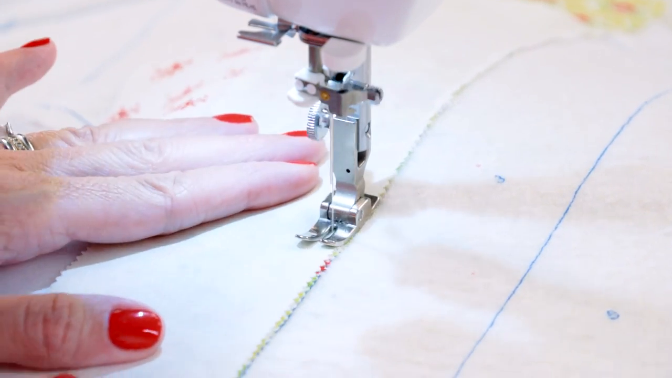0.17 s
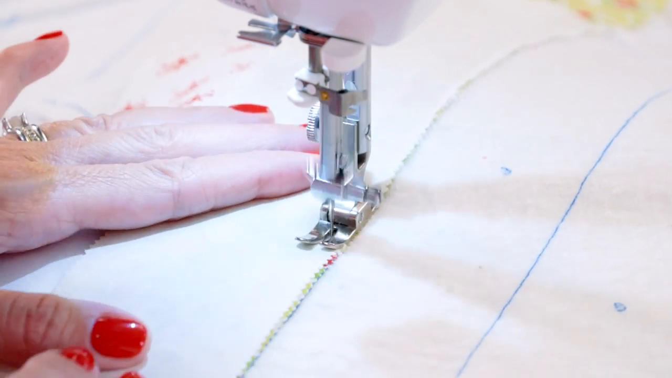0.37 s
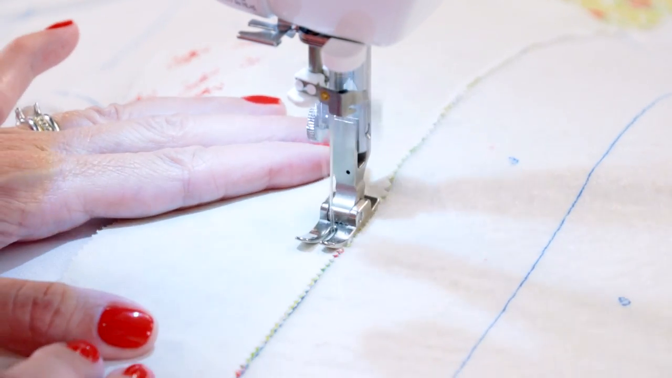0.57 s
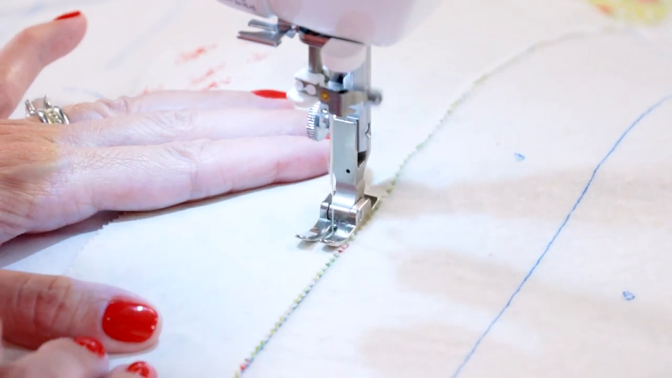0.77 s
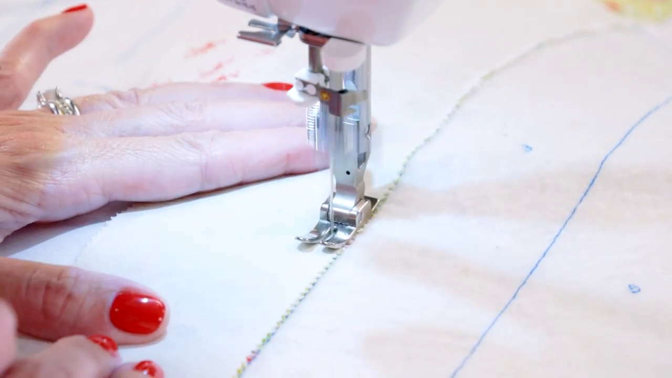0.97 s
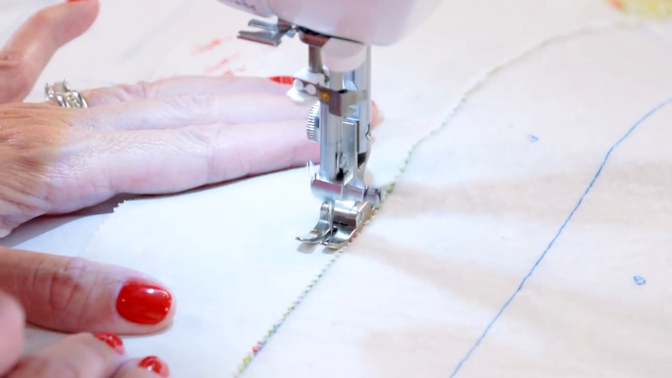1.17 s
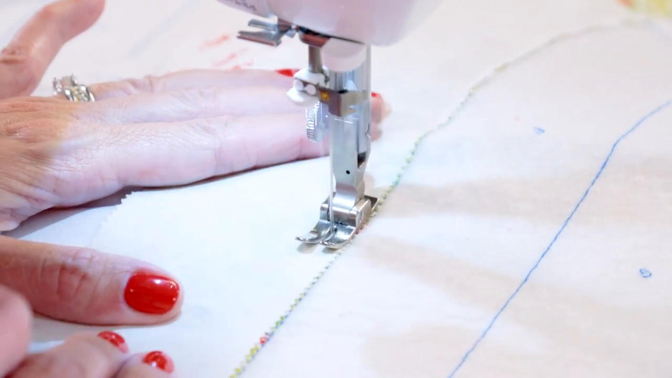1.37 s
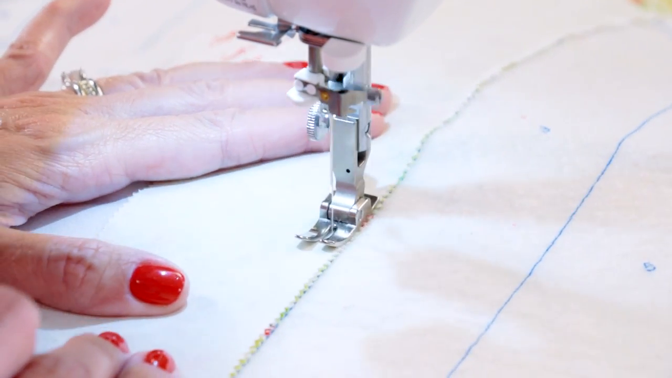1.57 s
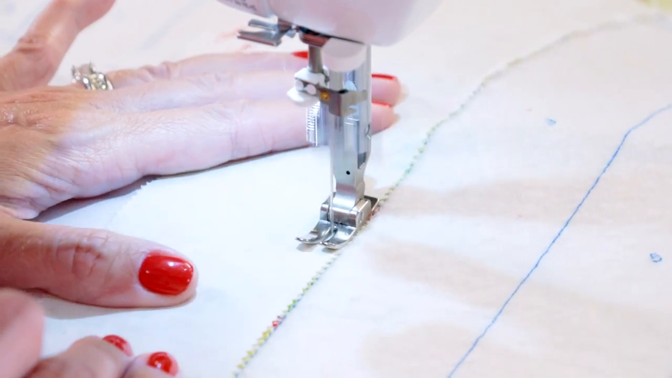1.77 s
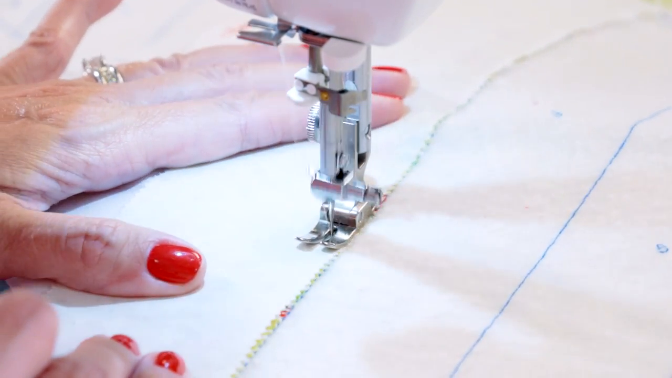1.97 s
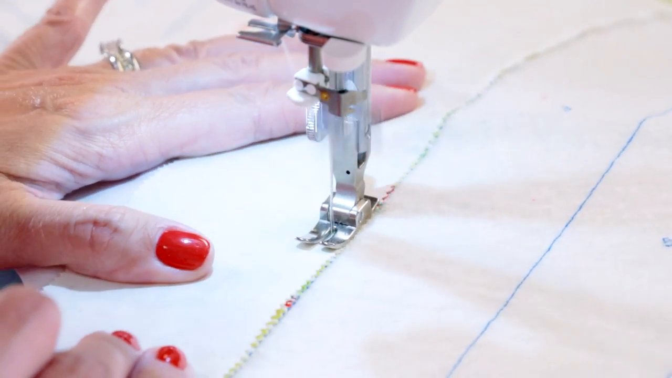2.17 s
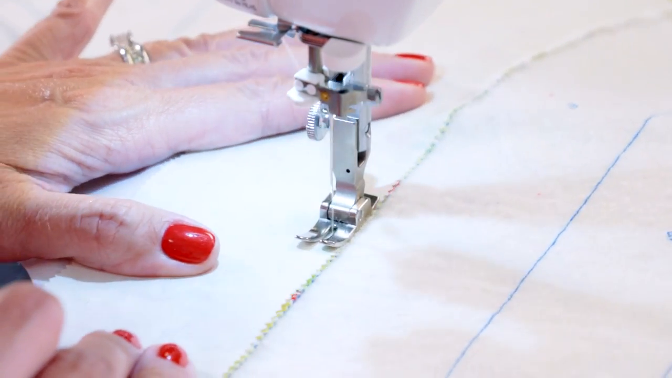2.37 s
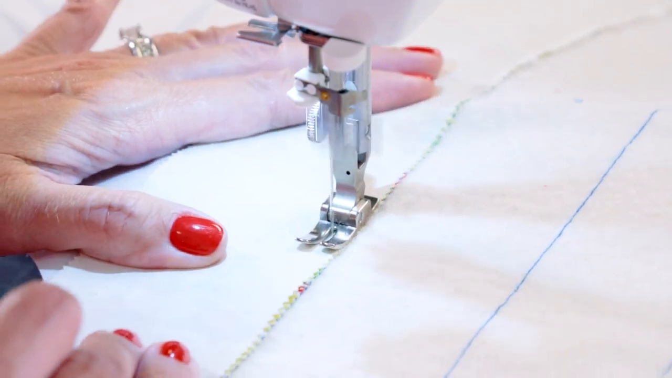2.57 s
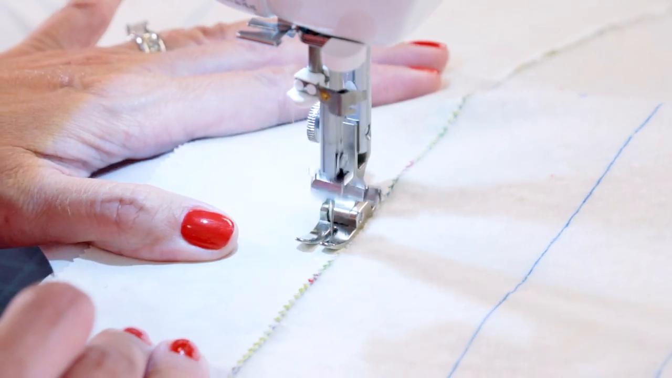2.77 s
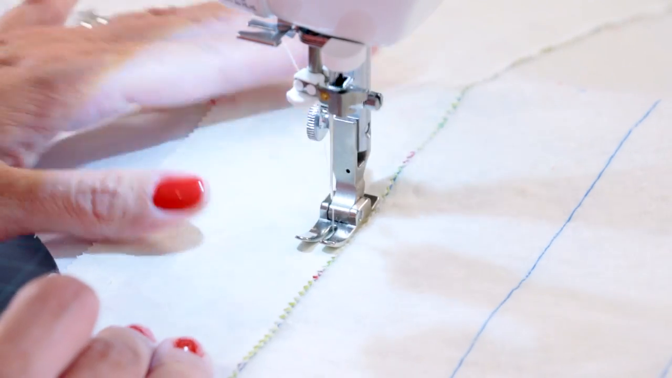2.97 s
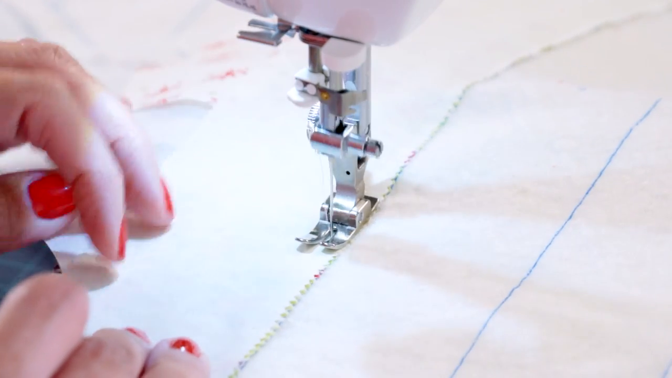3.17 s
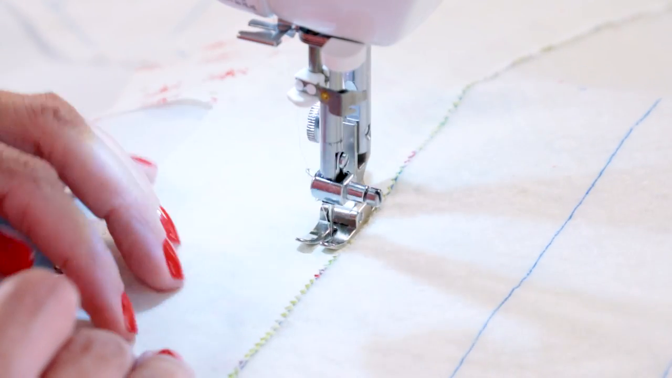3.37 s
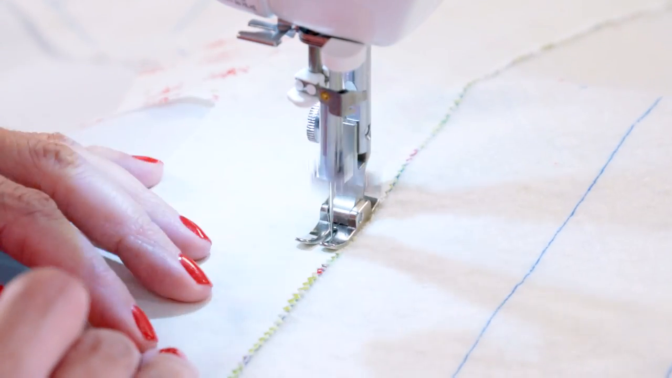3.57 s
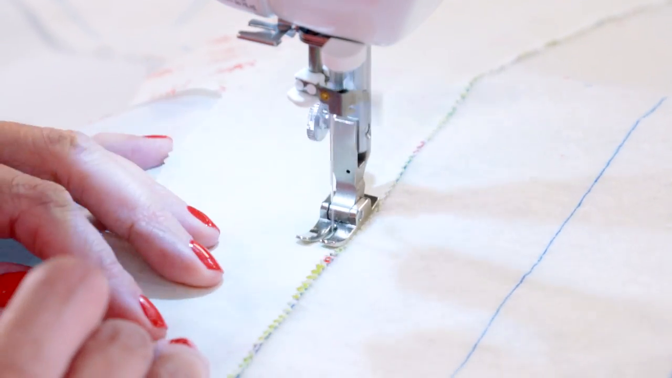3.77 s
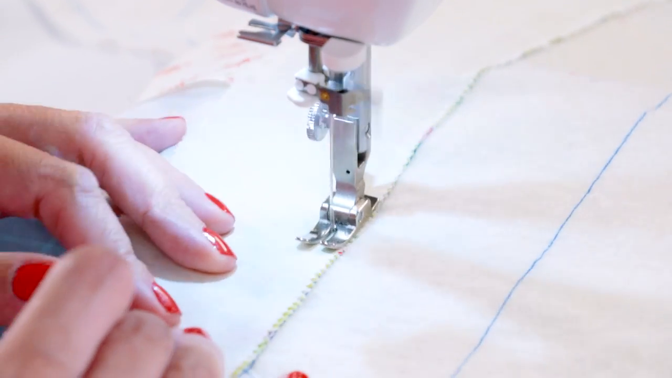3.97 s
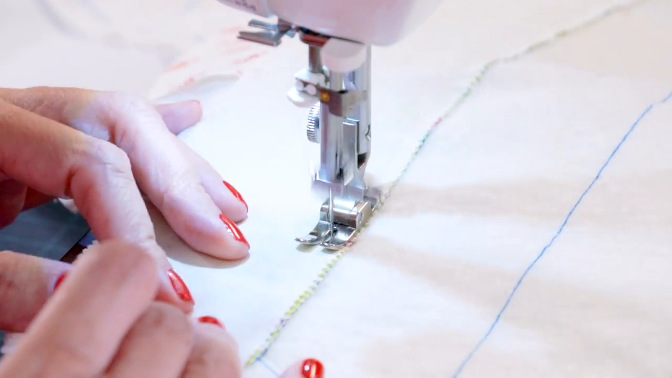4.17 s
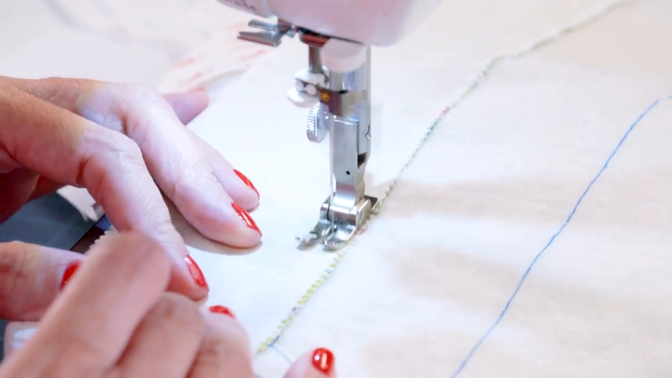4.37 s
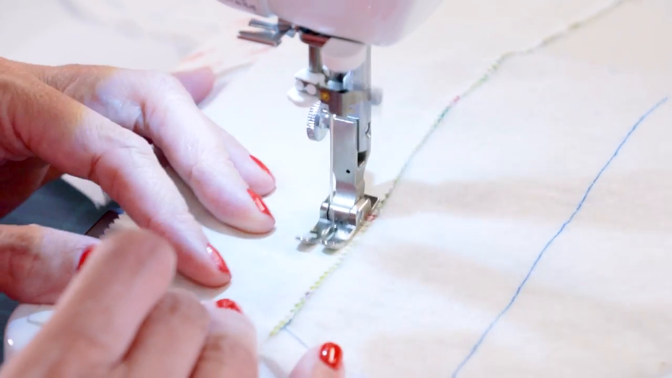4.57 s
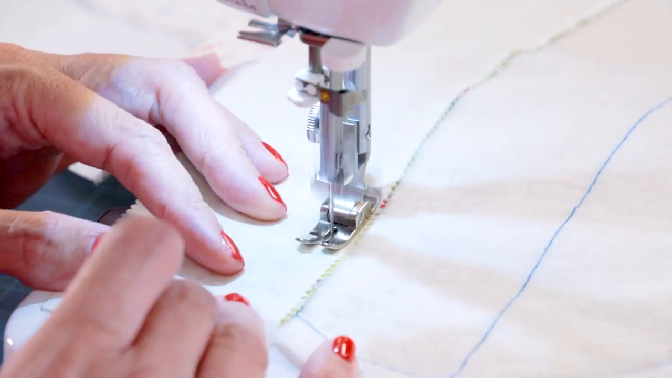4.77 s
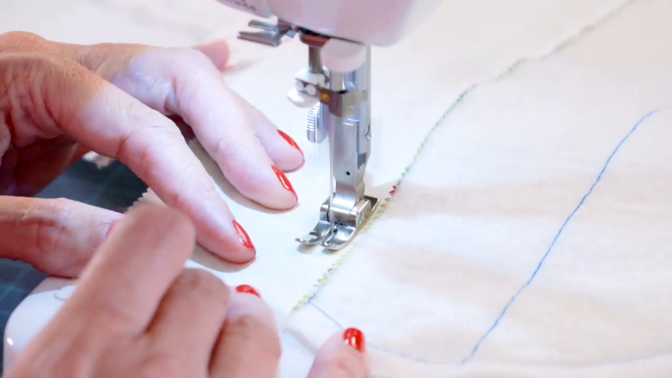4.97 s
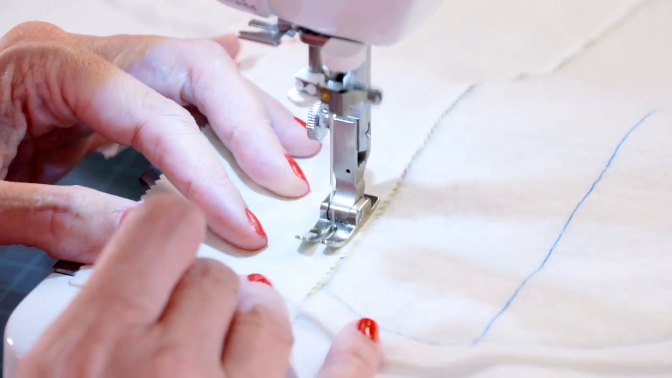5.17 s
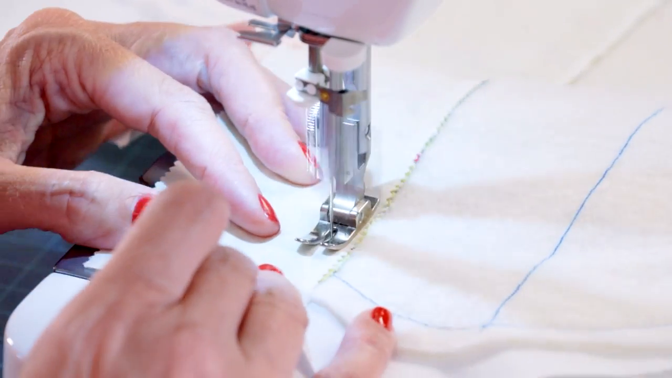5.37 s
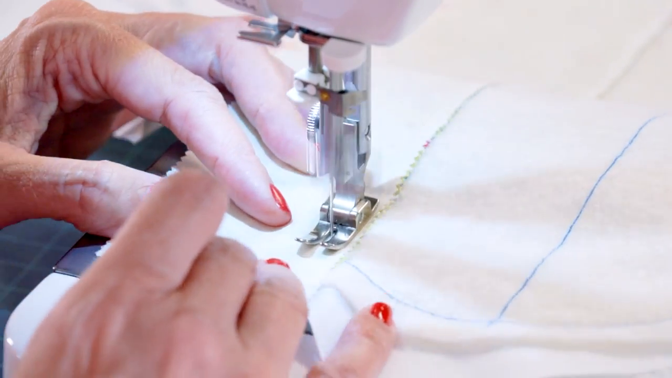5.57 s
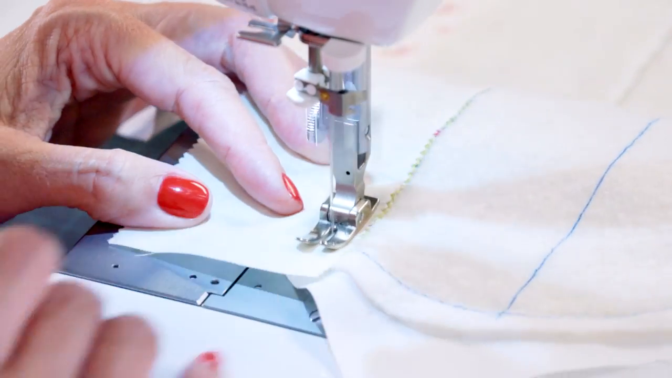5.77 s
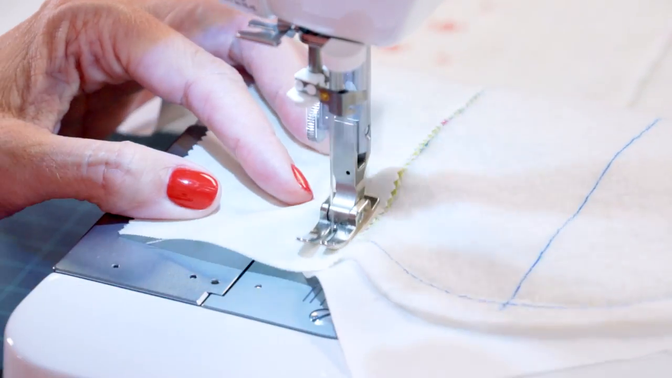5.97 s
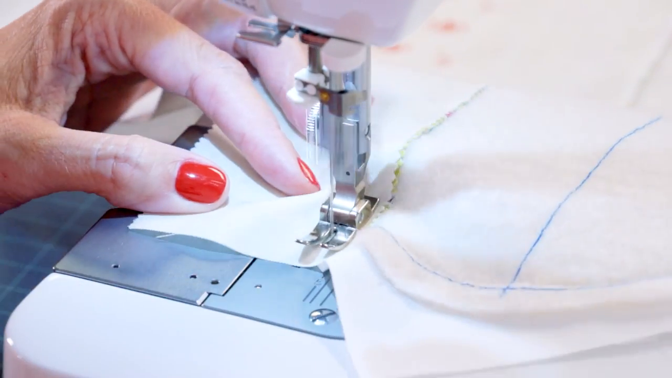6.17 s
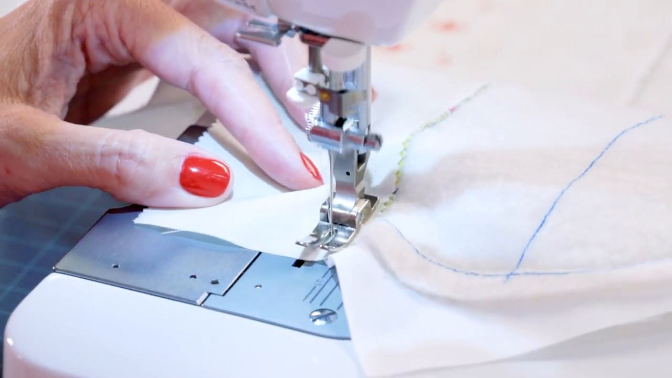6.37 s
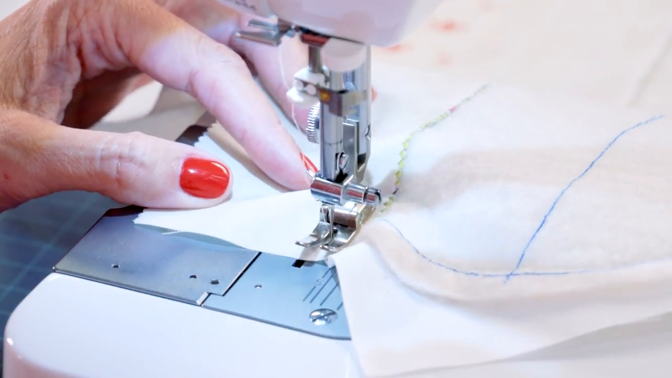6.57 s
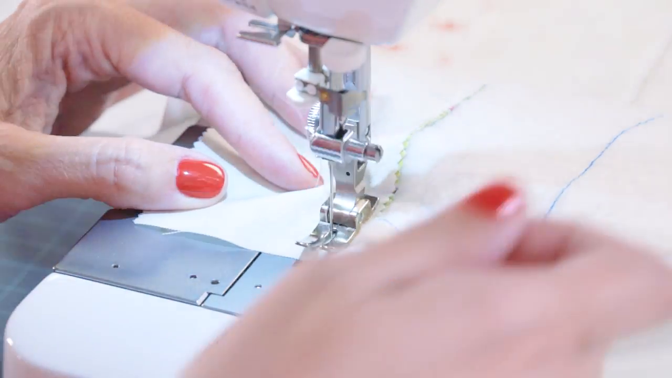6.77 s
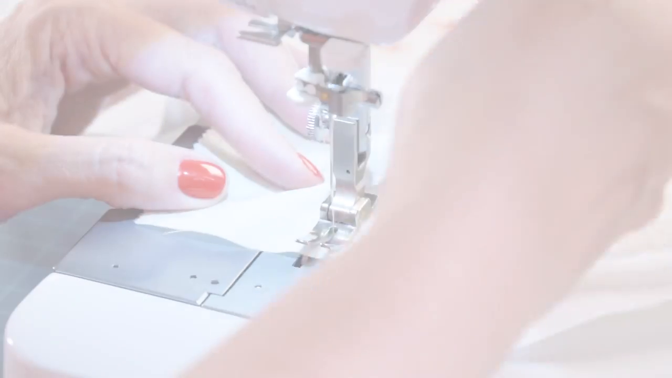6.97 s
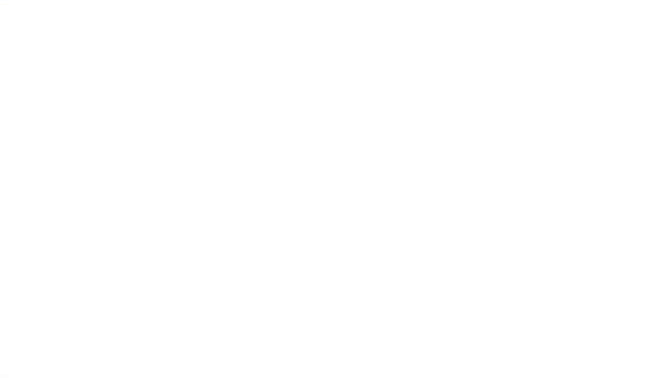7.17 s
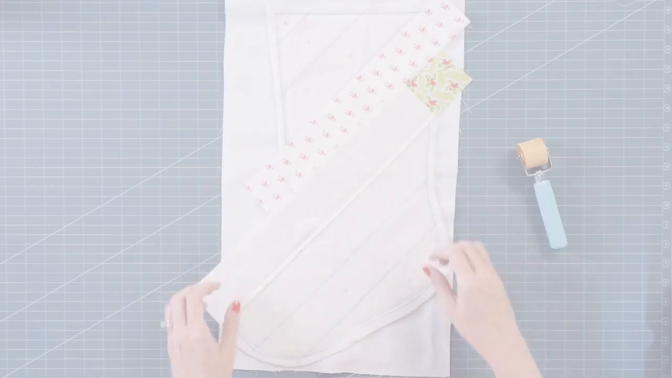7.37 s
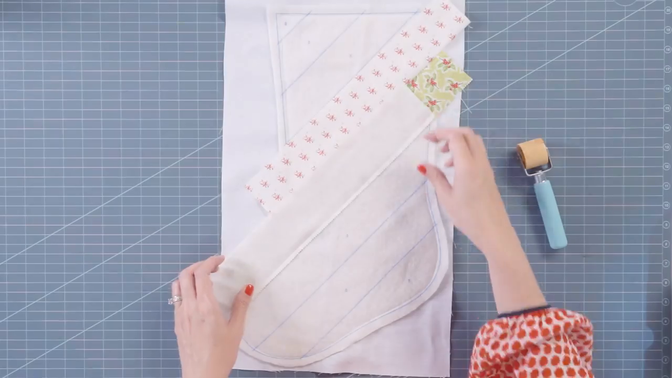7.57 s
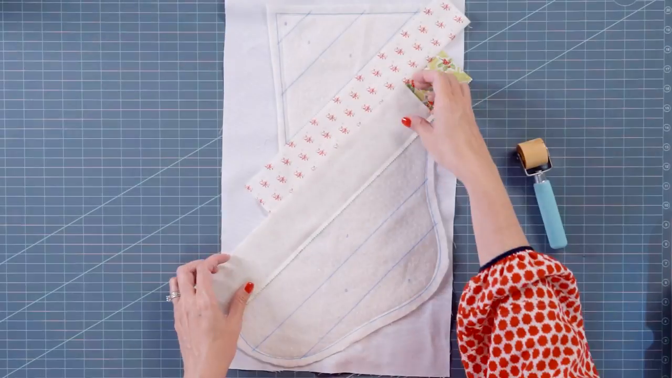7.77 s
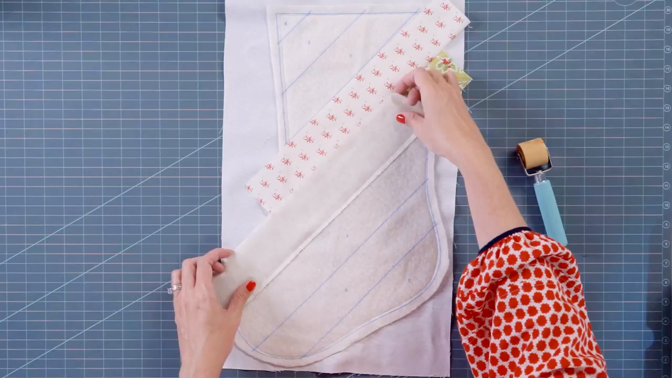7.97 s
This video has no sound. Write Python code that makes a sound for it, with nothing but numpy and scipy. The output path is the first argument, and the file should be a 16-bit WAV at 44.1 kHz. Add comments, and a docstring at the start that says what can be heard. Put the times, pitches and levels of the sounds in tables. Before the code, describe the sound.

A sewing machine knocks and whines through a seam, pauses briefly, sews faster and stops, followed by a rattling lever and a hollow clack.

```python
"""Sewing machine in a quiet room

An electric sewing machine sews two runs of stitches, the second one faster. Its parts knock in the
same pattern on every turn of the shaft, while the toothed belt sings, the motor whines and sliding
parts hiss. Then a lever clatters in the housing and drops onto its stop. Small things tick under
the hands in the pause and at the end."""
import sys
import numpy as np
from scipy import signal
from scipy.io import wavfile
from scipy.ndimage import uniform_filter1d

SR = 44100
rng = np.random.default_rng(int(sys.argv[2]) if len(sys.argv) > 2 else 0)


def master(y):
    """Save y as 16-bit WAV."""
    cut = np.clip(np.atleast_2d(y).T, -1, 1)
    pcm = np.round(cut * 32767)  # scale
    wavfile.write(sys.argv[1], SR, pcm.astype(np.int16))


N = 353682

# Steady room air, its tone color: pitch_hz, relative_db
AIR_COLOR = [(12, -30), (20, 12), (50, -8), (81, 1.5), (110, -5), (335, -15), (419, -14.5), (674, -18.5),
             (1350, -25), (4020, -32), (7860, -40.5), (15800, -50.5)]
# How loud the air is over time: time_s, level_db
AIR_LEVEL = [(0, -44), (3.3, -51), (6.6, -50), (7.6, -50.5), (8.02, -53.5)]
# Hum of the electric supply: pitch_hz, level_db
HUM_TONES = [(59.5, -54), (121, -69.5)]

# Shaft speed, one list for each run (one turn makes one stitch): time_s, turns_per_s
RUN_SPEEDS = [
    [(0.0, 5.182), (0.333, 11.856), (0.529, 13.776), (2.89, 13.727), (2.91, 13.0), (2.935, 13.6),
     (2.955, 9.8), (2.98, 9.4), (3.03, 7.0), (3.06, 3.2), (3.11, 2.2)],
    [(3.463, 0), (3.841, 19.934), (3.963, 21.534), (5.581, 21.505), (5.7, 20.766), (5.844, 20.695),
     (6.033, 19.942), (6.28, 19.945), (6.3, 18.0), (6.315, 17.0), (6.325, 14.0), (6.337, 13.6),
     (6.352, 9.5), (6.37, 8.5), (6.5, 1.2)],
]
# Where the shaft stands as each run begins: angle_turns
START_ANGLES = [0.005, .589]
FULL_SPEED = 21.5   # turns a second; the machine's levels are set for this speed
# Parts that hit each other once a turn: angle_turns, thud_db, knock_db, tick_db
CONTACTS = [(0.1, -27.5, -37, -61), (.19, -26.5, -15, -41.5), (0.251, -32, -20, -34.5),
            (.42, -25, -19.5, -33.5), (.48, -20.5, -27.5, -37.5), (.63, -81, -20, -43),
            (0.75, -36.5, -26, -45), (0.902, -46, -33.5, -50)]
# Ringing notes of the frame, struck by thuds: pitch_hz, width_hz, gain_db
FRAME_NOTES = [(110.4, 15.4, -7), (200, 37.6, -7.5), (252, 63.4, -2.5), (287.4, 50, -10.5)]
# Ringing notes of the metal shell and covers, struck by knocks: pitch_hz, width_hz, gain_db
SHELL_NOTES = [(407, 80, -20.5), (476.8, 11.8, -29), (594, 48, -22.5), (723, 53.5, -19.5), (887, 170, -8.5),
               (954, 108, -10.5), (1178, 141, -11.5), (1350, 116, -14), (1527, 187, -16), (1825, 44, -24.5),
               (2054, 216, -15), (2266, 29.5, -23), (2558, 165, -19.5), (2964, 118, -21.5),
               (3385, 90, -25.5), (3936, 196, -18.5), (4990, 150, -25.5), (5200, 204, -23)]
# Ringing notes of the steel needle parts, struck by ticks: pitch_hz, width_hz, gain_db
NEEDLE_NOTES = [(6440, 290, -10), (8930, 510, -15), (10500, 730, -15.5), (15000, 3000, -13)]
# Hiss of the sliding parts: pitch_hz, relative_db
HISS_COLOR = [(410, -35), (700, -14), (1100, -7.5), (1700, -0.5), (2600, -4), (4200, -9.5), (6000, -17),
              (9000, -28), (15800, -69)]
# How well the shell passes the belt's tones to the air: pitch_hz, level_db
BELT_LEVELS = [(300, -43), (600, -38.5), (760, -27.5), (950, -30.5), (1073, -26), (1250, -27.5),
               (1550, -36), (1680, -36), (2150, -31), (2800, -42), (3360, -38)]
# How the pull on the belt varies in a turn: cycles_per_turn, level_share, bend_radians, angle_turns
BELT_PULL = [(1, 0.053, 0.33, 0.14), (2, .18, .1, 0.33), (3, 0.083, .1, 0.21), (6, 0.16, 0.045, 0.092)]
# How strongly the table shakes at each pitch: pitch_hz, level_db
TABLE_SHAKE = [(14, -59), (21.5, -62), (28, -66), (43, -43.5), (62, -59), (84, -35), (107, -41), (125, -83),
               (150, -55.5)]
# Stitches on which a steel part snaps hard: start_s, level_db
STEEL_SNAPS = [(0.2018, -36), (0.4434, -45), (0.5327, -34), (0.6784, -34), (0.8225, -37), (0.896, -30),
               (0.969, -32), (1.1876, -34), (1.5339, -42), (1.6054, -44), (1.6931, -42), (1.8387, -33),
               (1.9135, -37), (2.4784, -39), (3.7803, -35), (4.291, -35), (4.963, -27)]

# Ticks of fingers, pins and cloth: start_s, level_db, pitch_hz, width_share (of the pitch), fade_s
HAND_TICKS = [(3.1135, -33.5, 4970, 0.94, .003), (3.115, -32.5, 1600, 0.91, .006),
              (3.128, -38, 2000, 1.6, .003), (3.2207, -24.5, 7000, 0.8, 0.00078),
              (3.2207, -29, 13000, .6, .001), (3.227, -42, 7000, 1.25, .0011),
              (3.239, -48, 7000, 1.25, .001), (3.246, -47, 1200, 0.87, .0057), (3.251, -56, 6600, .3, .002),
              (3.307, -54, 6500, .4, .002), (3.557, -41, 850, .5, .006), (6.43, -32, 513, .3, .006),
              (6.445, -33.5, 510, 0.25, 0.0049), (6.64, -46, 870, 0.87, .015),
              (7.478, -31.5, 2700, 0.84, 0.0054), (7.48, -33, 440, 1.6, 0.012),
              (7.665, -44, 780, .4, 0.0058), (7.665, -42, 2470, 1.4, .002), (7.753, -51, 790, .3, .006),
              (7.776, -49, 2000, 2.4, .0006), (7.8148, -20, 4940, 0.97, 0.00076),
              (7.8148, -32, 12000, .7, .0008), (7.8172, -21, 5000, 0.56, 0.00099),
              (7.82, -49, 4500, 1.25, .008), (7.8343, -33, 5130, 0.21, .0015),
              (7.835, -41.5, 1060, 0.42, 0.0018), (7.878, -40.5, 1420, 0.53, .002),
              (7.878, -47, 4500, 1.4, .001), (7.9, -51, 2000, 1.25, .0013)]
# The lever hits the housing: start_s, level_db, pitch_hz, crack_db, scrape_s
LEVER_HITS = [(6.753, -39, 890, -22, .006), (6.762, -19.5, 2700, -11, 0.0032),
              (6.764, -29.5, 1000, -18, .003), (6.776, -23, 1200, -8, 0.0063),
              (6.847, -24.5, 2700, -7, .003), (6.853, -20.5, 1340, -8, 0.0044),
              (6.868, -26.5, 460, -25, .006), (6.897, -27, 2600, 5, 0.0056), (6.917, -29, 2500, -2, .003),
              (6.935, -27, 1350, -11, .006), (6.955, -25, 900, -25, 0.0089), (7.01, -27, 2200, 2, 0.0067),
              (7.028, -18, 3000, 1, 0.005), (7.032, -15.5, 1090, -4, 0.012), (7.086, -16, 800, 1.5, 0.0043),
              (7.102, -14, 990, -1, 0.0051), (7.113, -22, 900, 6, .004), (7.124, -17.5, 520, -2, 0.0042)]
# Ringing notes of the housing: pitch_hz, gain_db, ring_s (time to fade by 60 dB)
HOUSING_NOTES = [(115, -2, .1), (200, -6, 0.079), (262, -4.5, 0.063), (390, -34, .5), (453, 2.5, 0.078),
                 (642, -4, 0.039), (740, -5, 0.054), (833, 1.5, .06), (1034, 1, 0.025), (1186, -3, 0.04),
                 (1362, 2, 0.039), (1500, -12, 0.078), (2056, -4.5, 0.026), (2196, -8, 0.036),
                 (2700, 0.5, 0.016), (3100, 0, 0.013), (3830, -3, 0.012), (4630, -4, 0.013)]
# The lever drops onto its stop and bounces: start_s, level_db, pitch_hz, crack_db, scrape_s
LEVER_DROPS = [(7.2225, -10, 1090, -17, 0.0029), (7.229, -14.5, 500, -23, 0.0034),
               (7.246, -20.5, 556, -5, 0.0068), (7.262, -26, 560, -22, 0.0053)]
# Ringing notes of the hollow arm behind the stop: pitch_hz, gain_db, ring_s
ARM_NOTES = [(290, -9, 0.065), (399, -18.5, 0.64), (440, -0.5, 0.094), (527, 2, .13), (612, 1, 0.09),
             (780, -4.5, 0.086), (820, -17, 0.47), (933, -11.5, 0.076), (1096, -8, 0.087),
             (1300, -13.5, 0.13), (1530, -8, 0.13), (1862, -11, 0.2), (1960, 0.5, 0.034), (2380, -14, .05),
             (3090, -11.5, 0.065)]


def from_db(db):
    """Turn decibels into a number to multiply by."""
    return 10 ** (np.asarray(db) / 20)


def unit_level(x):
    """Scale a sound so that its average strength (rms) is 1."""
    return x / np.sqrt(np.mean(x ** 2) + 1e-20)


def filtered(x, kind, hz, order=2):
    """Keep the part of a sound above a pitch ("high") or between two pitches ("band")."""
    return signal.sosfilt(signal.butter(order, hz, kind, fs=SR, output="sos"), x)


def over_time(points, outside=None):
    """Join (time_s, value) points with straight lines, giving a value for every sample."""
    times, values = np.transpose(points)
    return np.interp(np.arange(N) / SR, times, values, outside, outside)


def gain_at(points, hz):
    """Look up the gain at any pitch between (pitch_hz, level_db) points."""
    pitches, levels_db = np.transpose(points)
    return from_db(np.interp(np.log(hz), np.log(pitches), levels_db))


def fade_in_out(from_s, to_s, rise_db_per_s, fall_db_per_s):
    """A gain that rises, stays at 1 between two times, then falls."""
    t = np.arange(N) / SR
    return from_db(-rise_db_per_s * np.maximum(from_s - t, 0) - fall_db_per_s * np.maximum(t - to_s, 0))


def drift(rate_hz):
    """A smooth random wobble of about size 1; a higher rate wobbles faster."""
    step, warm_up = 40, 2000
    keep = np.exp(-2 * np.pi * rate_hz * step / SR)
    noise = rng.standard_normal(N // step + warm_up + 2)
    slow = signal.lfilter([1], [1, -2 * keep, keep * keep], noise)[warm_up:]
    return np.interp(np.arange(N) / step, np.arange(len(slow)), unit_level(slow))


def ring(clicks, hz, width_hz):
    """Each click starts a fading note; the wider the note, the sooner it dies."""
    keep = np.exp(-np.pi * width_hz / SR)
    angle = 2 * np.pi * min(hz, .45 * SR) / SR
    return signal.lfilter([0, np.sin(angle)], [1, -2 * keep * np.cos(angle), keep * keep], clicks + 1e-18)


def ring_part(clicks, notes):
    """A struck part rings with all its notes at once, every second one flipped over."""
    return sum((-1) ** k * from_db(db) * ring(clicks, hz, width)
               for k, (hz, width, db) in enumerate(notes))


def colored_noise(color, flicker_db):
    """Noise built from bands a third of an octave wide, each flickering on its own."""
    edges_hz = 18 * 2 ** np.arange(0, 9.9, 1 / 3)
    white = rng.standard_normal((2, N))
    out = np.zeros(N)
    for k, (low, high) in enumerate(zip(edges_hz, edges_hz[1:])):
        gain = gain_at(color, np.sqrt(low * high)) * from_db(flicker_db * drift(23))
        out += gain * filtered(white[k % 2], "band", [low, high])
    return unit_level(out)


def burst(fade_s):
    """A puff of noise that starts at once and dies away."""
    t = np.arange(3000) / SR
    return rng.standard_normal(len(t)) * np.exp(-t / fade_s)


def air_and_hum():
    """Soft room air and a wavering hum from the electric supply."""
    t = np.arange(N) / SR
    waver_db = 2.2 * drift(3)
    hum = sum(np.sqrt(2) * from_db(db + waver_db) * np.sin(2 * np.pi * hz * t) for hz, db in HUM_TONES)
    return from_db(over_time(AIR_LEVEL)) * colored_noise(AIR_COLOR, flicker_db=2.0) + hum


def shaft():
    """The shaft drives the machine: its speed in turns a second and its angle in turns."""
    speed, turns = np.zeros(N), np.zeros(N)
    for points, start_angle in zip(RUN_SPEEDS, START_ANGLES):
        run = over_time(points, outside=0)
        start = round(points[0][0] * SR)
        speed += run
        turns[start:] = start_angle + np.cumsum(run)[start:] / SR
    return speed, turns


def passes(speed, turns, angle):
    """The samples at which the turning shaft passes an angle."""
    return np.flatnonzero((np.diff(np.floor(turns - angle)) == 1) & (speed[1:] > 0))


def belt(speed, turns, teeth_per_turn=78, flutter_hz=42):
    """Belt teeth catch so fast that they sing; a jolt on each turn makes the belt flutter."""
    pace = speed / FULL_SPEED
    jolts = np.zeros(N)
    jolts[passes(speed, turns, angle=0.28)] = 1
    flutter = unit_level(ring(jolts, flutter_hz, width_hz=5))
    speed_slope = np.gradient(speed) * SR
    changing = uniform_filter1d(np.abs(speed_slope), size=1500)
    speeding_up = uniform_filter1d(np.maximum(speed_slope, 0), size=1500)

    phase = 2 * np.pi * teeth_per_turn * turns + 0.31 * flutter + .2 * pace * drift(40)
    phase += np.minimum(0.046 * changing, .6) * drift(90)   # teeth sit unevenly as the speed changes
    phase += 0.068 * speeding_up * np.sin(2 * np.pi * turns)   # a straining motor surges in each turn
    throb = 1 + .12 * flutter
    for cycles, level_share, bend, angle in BELT_PULL:
        pull_phase = 2 * np.pi * cycles * (turns - angle)
        phase += bend * np.sin(pull_phase)
        throb += level_share * np.cos(pull_phase)
    waver_db = 0.72 * drift(11) + 3.0 * pace ** 2 * drift(97) - 0.0554 * changing

    hz = np.maximum(teeth_per_turn * speed, 1)
    stitch_pulse = 1 + 0.2 * np.cos(2 * np.pi * (turns - 0.13))
    tones = gain_at(BELT_LEVELS, hz) * np.sin(phase)
    tones += from_db(-6) * gain_at(BELT_LEVELS, 2 * hz) * stitch_pulse * np.sin(2 * phase)
    tones += from_db(-14) * gain_at(BELT_LEVELS, 3 * hz) * np.sin(3 * phase)
    return np.sqrt(2) * throb * from_db(waver_db) * pace ** 0.98 * tones


def motor(speed, turns, cycles_per_turn=194, level_db=-46):
    """A whine that follows the speed, roughened by the motor's brushes and a surge in each turn."""
    phase = 2 * np.pi * cycles_per_turn * turns + 0.58 * drift(52) + 1.6 * np.sin(2 * np.pi * turns)
    level = from_db(level_db + 3.2 * drift(82)) * (speed / FULL_SPEED) ** 1.7
    return np.sqrt(2) * level * np.sin(phase)


def table_shake(speed, turns, peak_angle=0.2538):
    """The swinging needle bar shakes the table: low tones at 1 to 8 times the turning rate."""
    hz = np.maximum(speed, .1)
    tones = sum(gain_at(TABLE_SHAKE, k * hz) * np.cos(2 * np.pi * k * (turns - peak_angle))
                for k in range(1, 9))
    return np.sqrt(2) * tones * (speed / FULL_SPEED) ** 3.43


def sliding_hiss(speed, turns, level_db=-35, swell_db=9.5, swell_angle=0.23):
    """Bearings and thread hiss, brighter at speed; the treble swells while the needle is in the cloth."""
    pace = speed / FULL_SPEED
    hiss = colored_noise(HISS_COLOR, flicker_db=0.84)
    dulling = (pace ** 0.29 - 1) * filtered(hiss, "high", 2500, order=1)
    swell = from_db(swell_db * np.cos(2 * np.pi * (turns - swell_angle))) - 1
    return from_db(level_db) * pace ** 1.99 * (hiss + dulling + swell * filtered(hiss, "high", 6500))


def gear_chatter(speed, turns, bumps_per_turn=240, alike=.86, gain_db=-30):
    """Gears, cams and hook rub in a fine pattern that mostly repeats each turn, brighter at speed."""
    pace = speed / FULL_SPEED
    bump = np.floor(turns * bumps_per_turn).astype(int)
    at = passes(speed, bump, angle=0)
    repeating = rng.standard_normal(bumps_per_turn)[bump[at] % bumps_per_turn]
    clicks = np.zeros(N)
    clicks[at] = alike * repeating + np.sqrt(1 - alike ** 2) * rng.standard_normal(len(at))
    low = ring_part(clicks, [note for note in SHELL_NOTES if note[0] < 2800])
    high = ring_part(clicks, [note for note in SHELL_NOTES if note[0] >= 2800])
    return from_db(gain_db) * pace ** 0.74 * (low + pace ** 1.07 * high)


def stitch_knocks(speed, turns, uneven_db=(1.2, 2.1, 3.2), jingle_s=0.0018):
    """Parts hit once a turn, harder at speed; the harder the part, the more its hits vary."""
    hits = np.zeros((3, N))
    for angle, *levels_db in CONTACTS:
        at = passes(speed, turns, angle)
        chance_db = rng.standard_normal((len(at), 3)) * uneven_db
        hits[:, at] += from_db(levels_db + chance_db).T
    pace = speed / FULL_SPEED
    thud, knock, tick = hits * [pace, pace ** 1.1, pace]
    jingle = signal.lfilter([1], [1, -np.exp(-1 / (jingle_s * SR))], tick)   # steel chatters after a hit
    tick += from_db(-12) * rng.standard_normal(N) * jingle
    return ring_part(thud, FRAME_NOTES) + ring_part(knock, SHELL_NOTES) + ring_part(tick, NEEDLE_NOTES)


def feed_knock(speed, turns, pitch_hz=820, width_hz=110, uneven_db=3.7):
    """The teeth that move the cloth slap up once a turn, much harder at speed."""
    clicks = np.zeros(N)
    clicks[passes(speed, turns, angle=0.17)] = from_db(-19)
    clicks *= from_db(uneven_db * rng.standard_normal(N)) * (speed / FULL_SPEED) ** 2
    soft_push = ring(clicks, pitch_hz, 2.37 * width_hz) * 4 * np.pi * width_hz / SR
    return ring(soft_push, pitch_hz, width_hz)


def steel_snaps(low_hz=3700, high_hz=8900, fade_s=.0025):
    """On some stitches a steel part snaps with a bright crack."""
    hz = np.sqrt(low_hz * high_hz)
    return ticks([(start_s, db, hz, (high_hz - low_hz) / hz, fade_s) for start_s, db in STEEL_SNAPS])


def ticks(rows):
    """Small things touch: each tick is a tiny burst of noise around one pitch."""
    out = np.zeros(N)
    for start_s, level_db, hz, width_share, fade_s in rows:
        high_hz = hz * (width_share / 2 + np.hypot(1, width_share / 2))
        tick = filtered(burst(fade_s), "band", [hz ** 2 / high_hz, min(high_hz, .45 * SR)])
        start = round(start_s * SR)
        out[start:start + len(tick)] += from_db(level_db) * tick / np.abs(tick).max()
    return out


def cloth_rustle(level_db=-64.5):
    """Hands shift the cloth in the pause, making a dull rustle."""
    rustle = unit_level(filtered(rng.standard_normal(N), "band", [420, 1150]))
    return from_db(level_db) * fade_in_out(3.3, 3.6, rise_db_per_s=200, fall_db_per_s=200) * rustle


def lever_hits(rows, notes, spread_octaves, touch=2.7, crack_s=0.0044):
    """Each hit is a hard touch and a short scrape: it cracks, and rings the notes near its pitch."""
    out = np.zeros(N)
    for start_s, level_db, pitch_hz, crack_db, scrape_s in rows:
        push = np.pad(np.r_[touch, burst(scrape_s)], (0, 15000))   # silence leaves time to ring
        nearby = [(hz, np.log(1000) / np.pi / ring_s,
                   db - 6 * (np.log2(hz / pitch_hz) / spread_octaves) ** 2) for hz, db, ring_s in notes]
        ringing = ring_part(push, nearby)
        fade = np.exp(-np.arange(len(push)) / (crack_s * SR))
        crack = filtered(push * fade, "band", [700, 3500], order=1)
        hit = ringing / np.abs(ringing).max() + from_db(crack_db) * crack / np.abs(crack).max()
        start = round(start_s * SR)
        out[start:start + len(hit)] += from_db(level_db) * hit
    return out


def loose_rattle(taps_per_s=1500, gain_db=-37.5):
    """Loose parts tap the housing at random while the lever moves, then settle."""
    taps = (rng.random(N) < taps_per_s / SR) * from_db(3 * np.minimum(rng.exponential(1, N), 5))
    taps *= rng.choice([-1, 1], N)
    short_notes = [(hz, 23.0 / min(ring_s, .08), db) for hz, db, ring_s in HOUSING_NOTES]
    rattle = unit_level(ring_part(taps, short_notes))
    rattle += from_db(-6) * unit_level(filtered(taps, "band", [700, 3500], order=1))
    return from_db(gain_db) * fade_in_out(6.9, 7.14, rise_db_per_s=300, fall_db_per_s=104) * rattle


def lever():
    """The lever clatters in the housing, then drops onto its stop and rings the hollow arm."""
    clatter = lever_hits(LEVER_HITS, HOUSING_NOTES, spread_octaves=0.96)
    drop = lever_hits(LEVER_DROPS, ARM_NOTES, spread_octaves=1.6)
    return filtered(clatter + drop + loose_rattle(), "band", [90, 11000])


def room_echo(sound, ring_s=0.35, wall_cut_hz=5600):
    """Sound scatters, then bounces along eight paths, getting softer and duller each time."""
    smear = rng.standard_normal(700) * np.exp(-np.arange(700) / 200)
    scattered = signal.oaconvolve(sound, smear / np.linalg.norm(smear))[:N]
    dull = np.exp(-2 * np.pi * wall_cut_hz / SR)
    out = np.zeros(N)
    for k, delay in enumerate((rng.uniform(.012, .04, 8) * SR).astype(int)):
        path, state = scattered.copy(), [0.]
        gain = from_db(-60 * delay / SR / ring_s)
        for i in range(delay, N, delay):
            bounce, state = signal.lfilter([gain * (1 - dull)], [1, -dull], path[i - delay:i], zi=state)
            path[i:i + delay] += bounce[:N - i]
        out += (path - scattered) * (-1) ** k
    return out


def scene():
    """Mix to one channel: knocks and noises echo in the room, then the tones and air are added."""
    speed, turns = shaft()
    machine = stitch_knocks(speed, turns) + feed_knock(speed, turns) + gear_chatter(speed, turns)
    machine += sliding_hiss(speed, turns) + steel_snaps()
    machine = filtered(machine, "high", 110)   # small parts give off no deep bass
    noises = machine + lever() + cloth_rustle() + ticks(HAND_TICKS)
    echo = from_db(-15.5) * room_echo(noises)
    tones = belt(speed, turns) + motor(speed, turns) + table_shake(speed, turns)
    return (noises + echo + tones + air_and_hum())[None]


def record(dry):
    """Cut away the very highest treble, above 16600 Hz."""
    return signal.sosfilt(signal.cheby2(12, 70, 16600, fs=SR, output="sos"), dry)


dry = scene()
out = record(dry)
master(out)
```